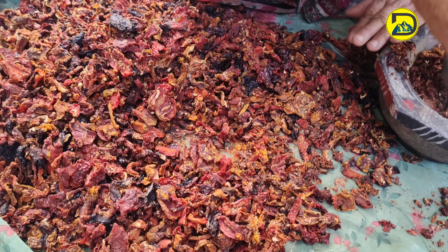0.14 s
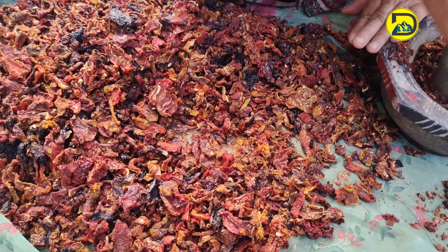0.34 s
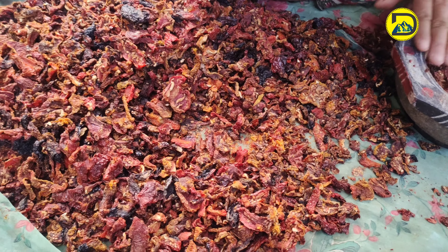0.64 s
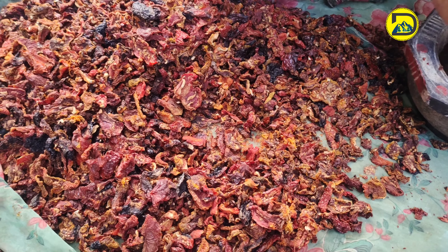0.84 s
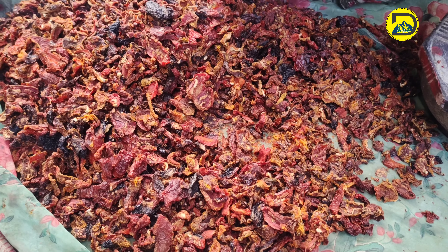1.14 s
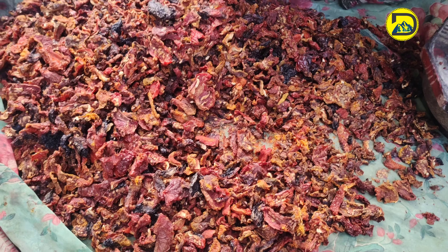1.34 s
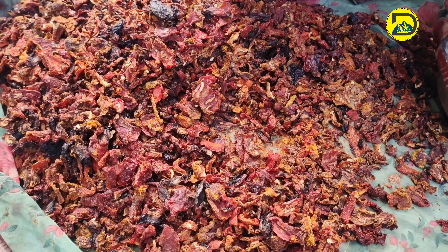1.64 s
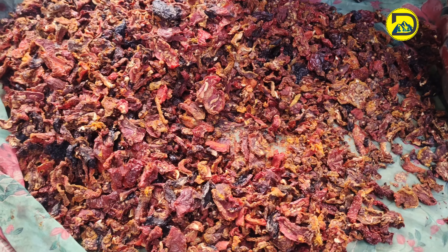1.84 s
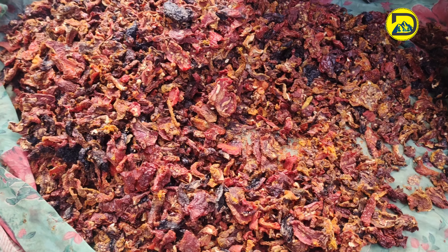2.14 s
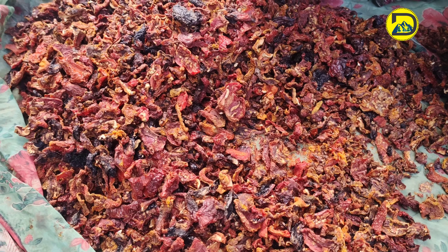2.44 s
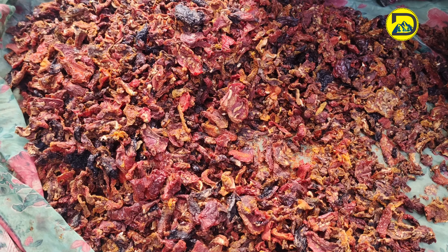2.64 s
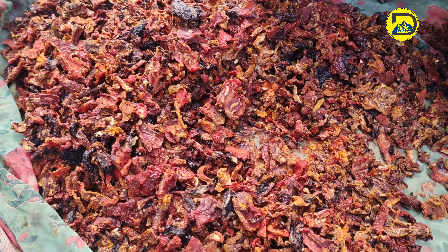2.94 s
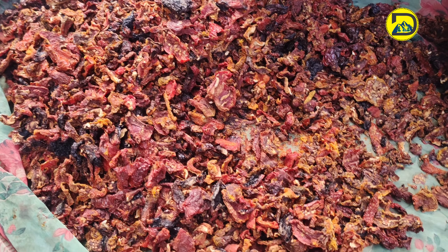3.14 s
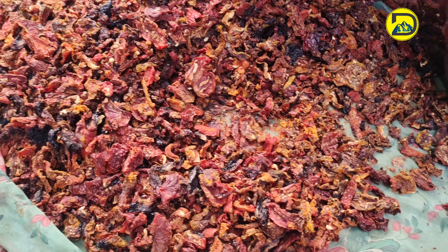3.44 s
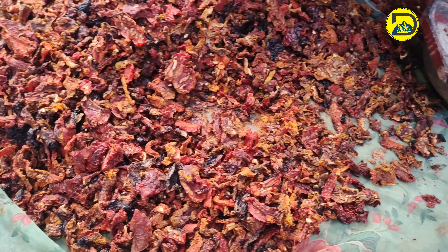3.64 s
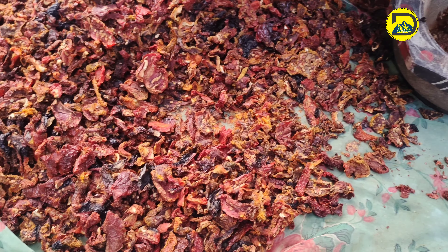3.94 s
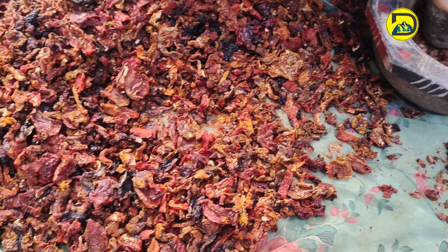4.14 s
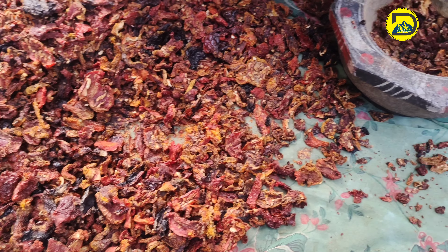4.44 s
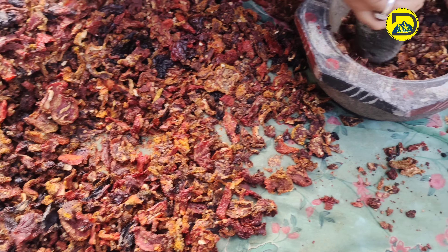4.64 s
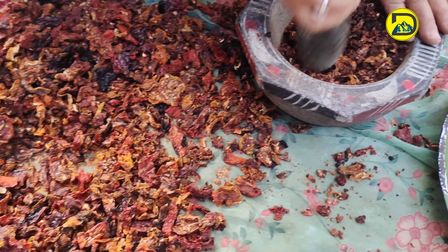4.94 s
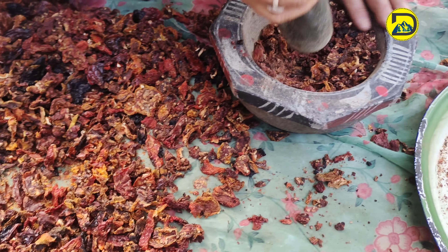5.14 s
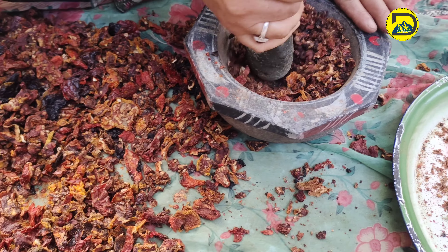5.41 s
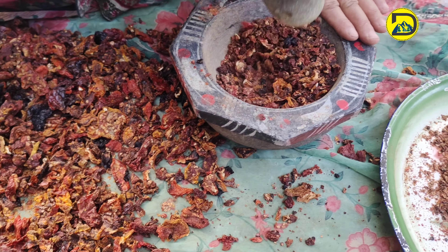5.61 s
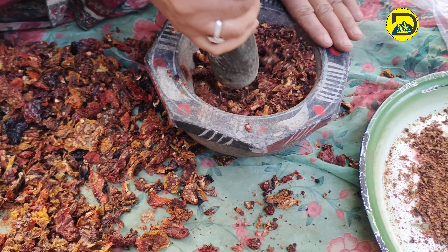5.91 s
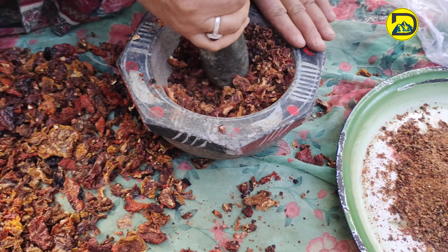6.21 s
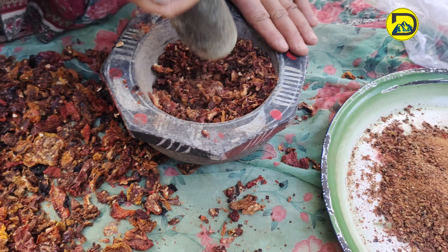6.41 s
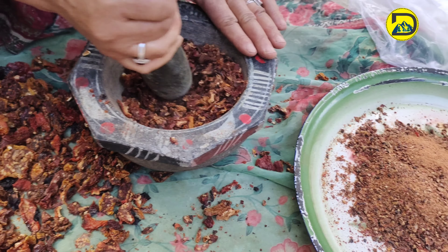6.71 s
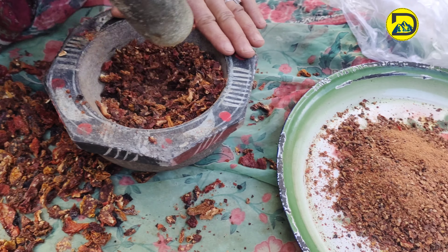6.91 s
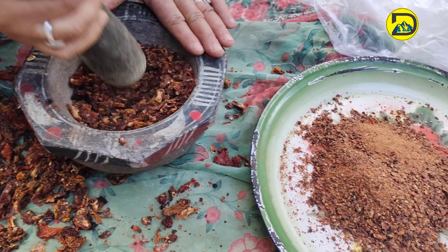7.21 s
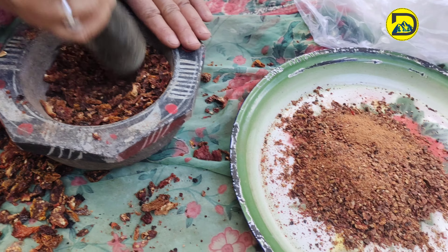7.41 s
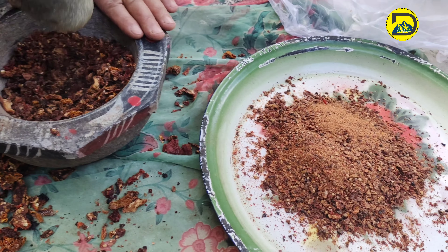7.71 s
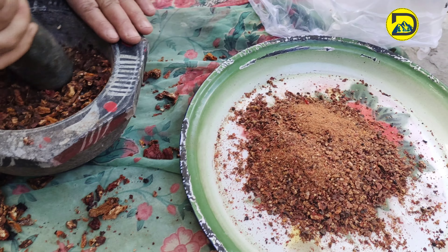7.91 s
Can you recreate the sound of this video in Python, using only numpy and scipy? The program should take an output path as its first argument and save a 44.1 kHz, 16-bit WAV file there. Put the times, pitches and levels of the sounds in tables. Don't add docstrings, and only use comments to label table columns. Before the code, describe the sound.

A stone pestle pounds brittle dried tomato in a stone mortar, steady crunching thuds close by, with a brief dropout and faint distant town hum.

```python
import sys
import numpy as np
from scipy import signal
from scipy.fft import rfft, irfft, next_fast_len
from scipy.io import wavfile
from scipy.ndimage import uniform_filter1d, map_coordinates

SR = 44100
rng = np.random.default_rng(int(sys.argv[2]) if len(sys.argv) > 2 else 0)


def dump_mix(stems):
    frames = np.atleast_2d(stems).T
    limited = np.clip(frames, -1, 1)
    pcm = np.round(limited * 32767).astype(np.int16)
    wavfile.write(sys.argv[1], SR, pcm)


def gain_from_db(level_db):
    decades = np.asarray(level_db, float) / 20
    return 10 ** decades


N = 355446

# (peak time [s], rms level [dB], build-up [s], collapse t60 [s], landing spot [-1 wall to 1 centre])
CRUSHES = [(0.1244, -35, 0.0045, 0.055, 0.43), (0.5184, -37, 0.008, 0.034, 0.73),
           (0.971, -30.5, 0.0132, 0.033, .95), (1.3821, -30.5, 0.015, 0.047, 0.55),
           (2.278, -31.5, 0.01, 0.043, 0.094), (2.686, -36, 0.008, 0.047, 0.25),
           (3.0806, -40, 0.01, 0.046, 0.49), (3.4787, -42, 0.01, 0.019, -0.094),
           (3.8575, -35.5, 0.0043, 0.034, 0.77), (4.27, -32, 0.021, 0.039, 0.14),
           (4.683, -30, 0.0098, 0.016, 0.5), (5.1027, -31, 0.007, 0.02, 0.92),
           (5.5293, -32, 0.015, 0.032, -0.6), (5.9363, -27.5, 0.019, 0.028, -0.26),
           (6.3597, -27.5, 0.005, 0.042, -0.61), (6.7843, -26.5, 0.0099, 0.017, -1.2),
           (7.1935, -29, 0.014, 0.019, -0.44), (7.6117, -30.0, 0.012, 0.017, -0.86),
           (8.0049, -29.5, 0.0089, 0.023, -0.3)]
# (frequency [Hz], level [dB])
BRITTLE_TONE = [(290, -35), (500, -18.5), (679, -6.5), (1490, -1), (2280, -5), (3230, 3), (5790, -10.5),
                (7320, -6.5), (8470, -8), (14700, -16.5), (15600, -17), (16300, -49)]
# (centre [Hz], width [Hz], level [dB], lift by landing spot [dB per unit], lift by phone turn [dB per dB])
BOWL_CAVITY = [(870, 610, -0.5, -7, -0.4), (1494, 290, -1.5, 12.5, 0.14), (2500, 220, 5, 4, -0.6),
               (3300, 540, -.5, 1.5, -.4), (4000, 490, -3, 1, 2.9)]
USUAL_CRUSH_DB, USUAL_COLLAPSE_S = -32, 0.03
SETTLE_DB, SETTLE_LAGS = -23.5, 0.55
TREBLE_DB, TREBLE_DB_PER_S = -0.5, 126.5
SETTLE_CAVITY, SETTLE_GRAIN_DB = 0.35, 1.8

# (time [s], peak level [dB], pitch [Hz], knock level [dB], ring level [dB])
BLOWS = [(0.1325, -23.5, 137, 8, 1), (0.142, -25.5, 125, -13, 1), (0.524, -6.5, 182.6, 7, -10),
         (0.9781, -24, 208, 4.5, 2), (1.3838, -23, 207.6, 5.5, -20), (1.3927, -15.5, 167.4, -2.5, 9),
         (2.2796, -34, 143.5, 10, 14), (2.2891, -30, 222.4, -10, -3), (2.6935, -23.5, 193, 2, -3),
         (3.089, -16.5, 196, -6, -24), (3.4826, -6.5, 171, 5.5, 2), (3.8662, -7.5, 172, 0.5, 5),
         (4.2728, -29, 125.6, -14, -7), (4.2806, -16.5, 184, -4, 4), (4.689, -13.5, 170, 1.5, 8),
         (5.1105, -5.5, 177.4, 3.5, 8.5), (5.536, -13, 168, 4.5, 8), (5.9457, -21, 170, 1, -10),
         (6.3665, -26, 153, -2, -7), (6.7911, -13, 195, 1, 8), (7.2, -24, 133, 3.5, -8),
         (7.6163, -15.5, 156, -6, -1), (8.014, -16.5, 159, -5, -13)]
# (time [s], peak level [dB], pitch [Hz])
ROCKS = [
    (0.169, -24.5, 214),
    (0.186, -32.5, 140),
    (3.909, -20.5, 187),
    (7.641, -28, 170),
    (7.667, -32, 165),
    (8.0507, -22, 186),
]
ROCK_KNOCK_DB, ROCK_RING_DB, ROCK_RUMBLE_DB = -6.5, -9, -3.5
# (frequency [Hz], level [dB], t60 [s])
KNOCK_MODES = [(303, 0.5, .05), (436.8, -6, 0.079), (610, -10.5, 0.027), (730, -8.5, 0.023),
               (847, -8, .025), (1397, -12.5, 0.025)]
# (frequency [Hz], level [dB], t60 [s])
RING_MODES = [(407.4, -9, 0.22), (757, -17.5, 0.48), (840, -19.5, 0.22), (925, -5, 0.19), (1107, -26, .2),
              (1210, -11.5, 0.11), (1305, -16.5, 0.17)]
# (frequency [Hz], level [dB])
GROUND_TONE = [(24, -60.5), (40, -19.5), (180, -1), (543, -15.5), (856, -25.5), (923, -21), (1010, -30),
               (1250, -24.5), (1500, -47), (1950, -74.5), (3300, -120)]
USUAL_BLOW_DB = -16
RUMBLE_DB, RUMBLE_LAGS = -0.5, 0.12
RUMBLE_BRIGHTENS = 0.45

# (start [s], end [s], pitch [Hz], rms level [dB])
WALL_SCRAPES = [
    (1.14, 1.28, 3320, -64),
    (5.29, 5.37, 3540, -59.5),
    (3.96, 4.06, 3400, -60.5),
    (1.97, 2.06, 3840, -69),
]
SCRAPE_WIDTH_HZ = 190

# (time [s], peak level [dB], pitch [Hz], left-right difference [dB], length [cycles])
CRUMB_TICKS = [(0.1206, -40, 4910, 5.5, 1.1), (.2494, -46, 2980, 8, 1.1), (.448, -43, 8000, -8, 1.8),
               (.7653, -45.5, 7240, -8, 2.1), (1.2866, -34, 2650, 4, 2.8), (1.2866, -44.5, 6830, -13, 3.8),
               (3.6218, -47, 6000, -5, 1.14), (3.8188, -37, 3000, 3, 2.6), (3.819, -42, 4120, 2, 5),
               (3.978, -47, 2980, 13, 1.5), (4.1156, -46, 7540, -19, 1.6), (5.0525, -26, 7600, -4, 1.1),
               (5.068, -44, 5000, -5, 2.7), (5.2186, -53, 3670, 4, 5), (5.440, -49, 7700, -7, 5),
               (5.445, -47, 6800, -11, 3), (5.6362, -47, 3470, 8, 4.4), (6.028, -50, 7400, -22, 2.2),
               (6.1341, -49.5, 7300, -24, 2.6), (6.74, -51, 6000, -4, 2.1), (7.462, -52, 7500, -6, 4.6),
               (7.5935, -28, 2400, 1, 1.8), (7.681, -44, 7000, -2, 2.7)]
# (time [s], peak level [dB], pitch [Hz], left-right difference [dB])
FINGER_TAPS = [
    (.027, -40, 550, -2),
    (.068, -40, 536, 11),
    (.110, -51.5, 1400, -3),
    (.338, -44, 544, 19.5),
    (6.115, -50, 793, 21),
]
TAP_CYCLES = 0.7
# (pitch [Hz], level [dB])
CRUMB_RATTLE = [(550, -30.5), (3000, -14), (7000, -13.5)]

# (time [s], level [dB])
TOWN_HUM = [(0, -53.5), (1, -55.5), (1.6, -54), (2.1, -55.5), (3.6, -53.5), (5.2, -54.5), (5.7, -55),
            (6, -56), (6.5, -56), (7.6, -55), (8.06, -55.5)]
# (time [s], half length [s], level
# over usual hiss [dB])
CLOTH_STIRS = [(.02, 0.086, -2.5), (.27, 0.21, 0.5), (0.636, 0.18, 4), (1.167, 0.17, 4), (1.9, 0.078, -7.5),
               (2.013, 0.1, 4), (3.2, 0.39, -2.5), (4.003, .1, 6.5), (4.498, 0.11, 4.5),
               (5.343, 0.025, 9.5), (5.9, 0.52, 2.5), (8.06, 0.14, -4)]
# (frequency [Hz], level [dB])
AIR_TONE = [(18, -66), (30, -48.5), (86, -6), (118, -3), (158, -6.5), (190, -2.5), (545, -14), (830, -15.5),
            (1650, -29.5), (2320, -29), (6320, -38), (14700, -41), (16300, -50.5)]
# (frequency [Hz], left-right likeness [-1 to 1])
YARD_LIKENESS = [(60, 0.95), (290, 0.88), (640, 0.39), (1400, -0.22), (3000, 0.03)]
RUSTLE_DB, HISS_DB, RUSTLE_FOLLOWS = -62, -68.8, 0.45

# (time [s], left-right difference [dB], left lag [ms])
MORTAR_PAN = [(0, -2.5, 0.15), (.5, 0.5, 0.19), (1.4, -0.5, 0.078), (2.3, 4, -0.06), (3.5, 3, 0.0027),
              (4.7, 2.5, 0.135), (6.3, -1, 0.25), (7.2, 0.5, .39), (8.06, -0.5, 0.45)]
# (frequency [Hz], left-right difference [dB])
PHONE_SHADING = [(200, 0), (600, -1), (1300, 1), (2500, 2), (3500, 5), (4300, 0), (5500, -6), (7000, -11),
                 (9500, -4), (12000, -9)]
MORTAR_SHADING = 1.235
# (frequency [Hz], t60 [s])
WALL_ECHO = [(100, 0.48), (300, 0.19), (1000, 0.19), (3000, 0.15), (10000, 0.06)]
# (off [s], on [s], fade-in [s])
SILENCE = (1.592, 1.884, 0.053)
MIC_TOP_HZ = 16400


def crush():
    out, lead = np.zeros((2, N)), 0.03
    t = np.arange(SR // 4) / SR - lead
    when, pans_db, lags_ms = np.transpose(MORTAR_PAN)
    for s, db, rise, t60, spot in CRUSHES:
        pan_db, lag_ms = np.interp(s, when, pans_db), np.interp(s, when, lags_ms)
        treble_db = TREBLE_DB + TREBLE_DB_PER_S * (t60 - USUAL_COLLAPSE_S)
        settle_db = SETTLE_DB - SETTLE_LAGS * (db - USUAL_CRUSH_DB)

        size_db = 2.1 * rng.standard_normal(len(t) // 12 + 1).repeat(12)[:len(t)]
        clump_db = 2.2 * map_coordinates(rng.standard_normal(len(t) // 60 + 2), [np.arange(len(t)) / 60])
        snaps = rng.standard_normal(len(t)) + 0.5 * rng.standard_normal((2, len(t)))
        snaps = snaps * gain_from_db(size_db + clump_db)

        def tone(hz, cavity_share=1):
            cavity_db = sum((lift + spot * by_spot + pan_db * by_pan) / (1 + (2 * (hz - centre) / width) ** 2)
                            for centre, width, lift, by_spot, by_pan in BOWL_CAVITY)
            dryness_db = along([(4500, 0), (6500, treble_db)], hz)
            return gain_from_db(along(BRITTLE_TONE, hz) + cavity_share * cavity_db + dryness_db)

        sunk = np.clip(1 + t / rise, 0, 1)
        swell = (sunk > 0) * (0.1 + 1.143 * sunk ** 1.37)
        collapse = gain_from_db(-60 * np.clip(t, 0, 1) / t60)
        settle = gain_from_db(settle_db - 60 * np.abs(t) / 0.41) * np.clip(t / 0.021, 0, 1)
        clumps = gain_from_db(SETTLE_GRAIN_DB * clump_db / clump_db.std())
        loose = unit(clumps * filtered(snaps, lambda hz: tone(hz, SETTLE_CAVITY)))
        pieces = gain_from_db(db) * swell * (unit(filtered(snaps, tone)) * collapse + loose * settle)

        twist = 1.14 * rng.standard_normal((2, 40))
        add(out, gain_from_db(4.5) * placed(pieces, lag_ms, pan_db, MORTAR_SHADING, twist), s - lead)
        echo = signal.fftconvolve(pieces, tail(0.22), axes=1)
        add(out, gain_from_db(-11.0) * echo, s - lead + 0.012)
    return out


def thuds():
    out, lead = np.zeros((2, N)), 0.01
    t = np.arange(SR // 3) / SR - lead
    blows = [(*row, RUMBLE_DB - RUMBLE_LAGS * row[1]) for row in BLOWS]
    rocks = [(*row, ROCK_KNOCK_DB, ROCK_RING_DB, ROCK_RUMBLE_DB) for row in ROCKS]
    for s, db, hz, knock_db, ring_db, rumble_db in blows + rocks:
        u = t * hz
        onset, decay = gain_from_db(-9 * np.abs(u / 0.74) ** 3), gain_from_db(-9 * np.abs(u / 1.01) ** 2.0)
        sinking = 1 + 0.14 * np.clip(u, -2, 4)
        push = -np.where(u < 0, onset, decay) * np.cos(2 * np.pi * u / sinking)

        since = np.clip(t + 0.004024, 0, 1)
        freed = np.clip(since / 0.019, 0, 1) ** 2
        knock = gain_from_db(knock_db - 17.0) * ringing(KNOCK_MODES, since)
        ring = gain_from_db(ring_db - 25.5) * freed * ringing(RING_MODES, since)

        force_db = RUMBLE_BRIGHTENS * (db - USUAL_BLOW_DB)
        brighter = [(280, 0), (600, force_db), (1400, 0)]
        mid, side = filtered(tail(0.34), lambda f: gain_from_db(along(GROUND_TONE, f) + along(brighter, f)))
        rumble = np.array([mid + 0.21 * side, mid - 0.18 * side])[:, :len(t)] / np.linalg.norm(mid)
        rumble = rumble * np.clip(t / 0.0061, 0, 1)

        bowl = placed(push + knock + ring, 0.17, 0)
        add(out, gain_from_db(db) * (bowl + gain_from_db(rumble_db + 12) * rumble), s - lead - 0.0007)
    return out


def ringing(modes, t):
    scatter_db = 1.5 * rng.standard_normal(len(modes))
    return sum(gain_from_db(db + own_db - 60 * t / t60) * np.sin(2 * np.pi * hz * t)
               for (hz, db, t60), own_db in zip(modes, scatter_db))


def scrapes():
    out = np.zeros((2, N))
    for start, end, hz, db in WALL_SCRAPES:
        n = round((end - start) * SR)
        grain_db = 3 * rng.standard_normal(n // 90 + 1).repeat(90)[:n]
        grit = rng.standard_normal((2, n)) * gain_from_db(grain_db)
        drag = unit(filtered(grit, lambda f: 1 / (1 + ((f - hz) / SCRAPE_WIDTH_HZ) ** 2)))
        add(out, gain_from_db(db) * np.sqrt(np.hanning(n)) * drag, start)
    return out


def ticks():
    out, t = np.zeros((2, N)), np.arange(SR // 20) / SR
    side = np.array([[0.5], [-0.5]])
    taps = [(*row, TAP_CYCLES) for row in FINGER_TAPS]
    for s, db, hz, pan_db, cycles in taps + CRUMB_TICKS:
        def resonance(f):
            damping = 1j * f * hz / cycles
            return damping / (hz * hz - f * f + damping)

        rattle_db = along(CRUMB_RATTLE, hz)
        decay = gain_from_db(-60 * t / 0.006) + gain_from_db(rattle_db - 60 * t / 0.09)
        spit = filtered(decay * rng.standard_normal((2, len(t))), lambda f: resonance(f) ** 2)
        add(out, gain_from_db(db + side * pan_db) * spit / np.abs(spit).max(), s)
    return out


def yard():
    t = np.arange(N) / SR
    stir_db = sum(db * np.exp(-((t - s) / half) ** 2) for s, half, db in CLOTH_STIRS)
    layers = [
        (np.interp(t, *np.transpose(TOWN_HUM)), [(900, -11.0), (2000, -16)]),
        (RUSTLE_DB + RUSTLE_FOLLOWS * stir_db, [(500, -30.5), (1500, -6.5), (4500, -7), (7000, -21.5)]),
        (HISS_DB + stir_db, [(4000, -23.0), (6000, 3.5)])]
    out = np.zeros((2, N))
    for level_db, band in layers:
        def mid_side(hz):
            turn = np.arccos(np.clip(along(YARD_LIKENESS, hz), -1, 1)) / 2
            tone = gain_from_db(along(AIR_TONE, hz) + along(band, hz)) * (hz < 15450)
            return tone * [np.cos(turn), np.sin(turn)]

        z = signal.stft(rng.standard_normal((2, N)), nperseg=512)[2]
        patches = uniform_filter1d(rng.standard_normal(z.shape[1:]), 5, 0)
        patches = unit(uniform_filter1d(patches, 8, 1))
        pair = signal.istft(z * gain_from_db(1.4 * patches), nperseg=512)[1][:, :N]
        mid, side = filtered(pair, mid_side)
        out += gain_from_db(level_db) * unit(np.array([mid + side, mid - side]))
    return out


def placed(x, lag_ms, pan_db, shading=1, twist=np.zeros((2, 40))):
    side = np.array([[0.5], [-0.5]])

    def ports(hz):
        smear = np.array([np.interp(hz, np.linspace(500, SR / 2, 40), k, left=0) for k in twist])
        shade_db = np.where(hz > 4300, shading, 1) * along(PHONE_SHADING, hz)
        delay_s = (0.5 + side * lag_ms) / 1000
        return gain_from_db(side * (pan_db + shade_db)) * np.exp(1j * smear - 2j * np.pi * hz * delay_s)

    return filtered(x, ports)


def tail(seconds):
    hz, t, z = signal.stft(rng.standard_normal((2, round(seconds * SR))), SR, nperseg=256)
    decay = gain_from_db(-60 * t / along(WALL_ECHO, hz)[:, None])
    pair = signal.istft(z * decay, SR, nperseg=256)[1]
    return pair / np.linalg.norm(pair[0])


def unit(x):
    return x / np.sqrt(np.mean(x ** 2) + 1e-20)


def along(points, hz):
    f, v = np.transpose(points)
    return np.interp(np.log(hz + 1), np.log(f + 1), v)


def filtered(x, response):
    m = next_fast_len(x.shape[-1] + 1024)
    return irfft(rfft(x, m) * response(np.fft.rfftfreq(m, 1 / SR)), m)[..., :x.shape[-1]]


def add(track, sound, s):
    part = track[:, round(s * SR):][:, :sound.shape[-1]]
    part += sound[..., :part.shape[1]]


def scene():
    return crush() + thuds() + scrapes() + ticks() + yard()


def roll_off(x):
    return signal.sosfilt(signal.butter(12, 16470, fs=SR, output="sos"), x)


def record(dry):
    off, on, fade = SILENCE
    t = np.arange(N) / SR
    gate = np.where(t < off, 1, (t > on) * np.clip(0.23 + (t - on) / fade, 0, 1))
    bass_cut = [(30, -10), (60, -6), (100, 0)]
    heard = filtered(dry, lambda hz: gain_from_db(along(bass_cut, hz)) * (hz < MIC_TOP_HZ))
    return roll_off(heard * gate)


dry = scene()
out = record(dry)
dump_mix(out)
```